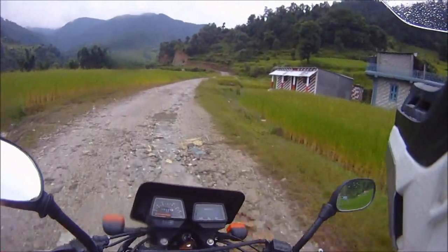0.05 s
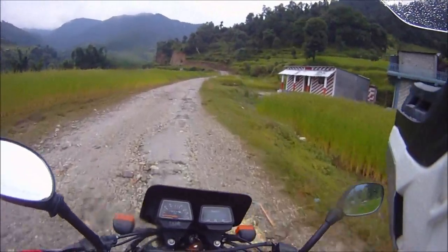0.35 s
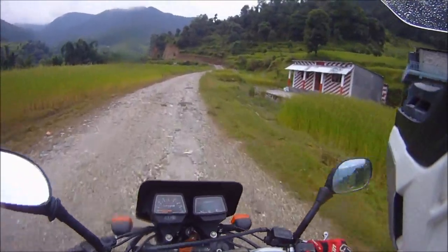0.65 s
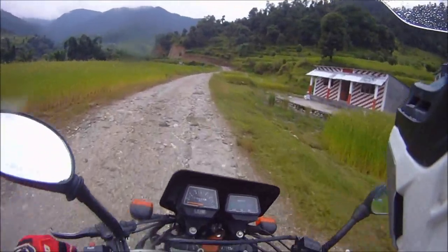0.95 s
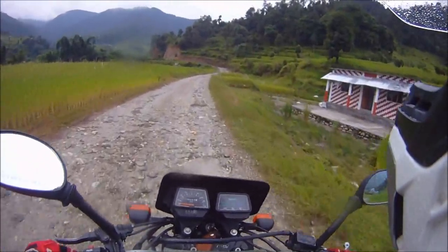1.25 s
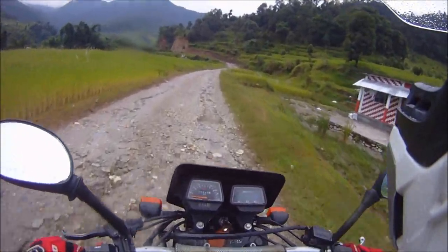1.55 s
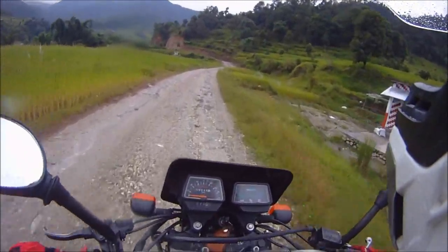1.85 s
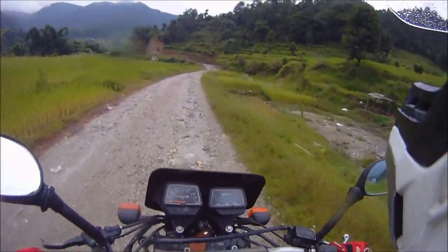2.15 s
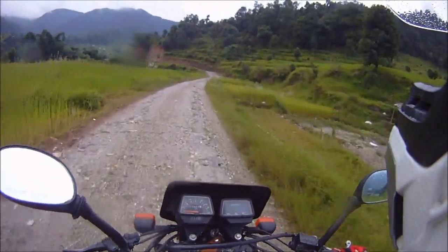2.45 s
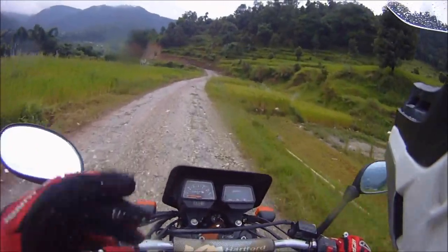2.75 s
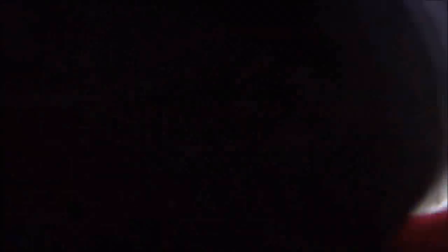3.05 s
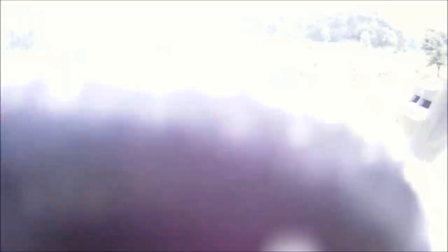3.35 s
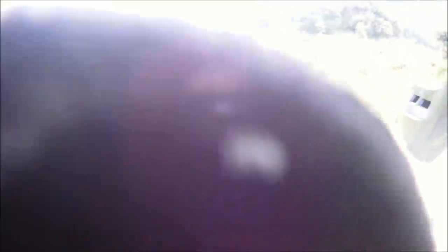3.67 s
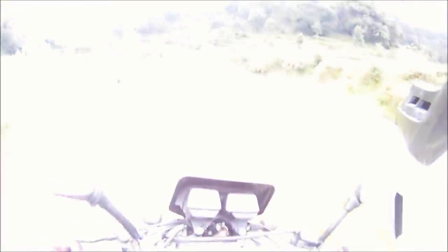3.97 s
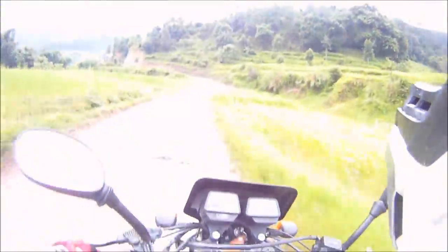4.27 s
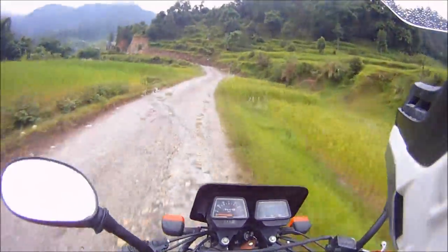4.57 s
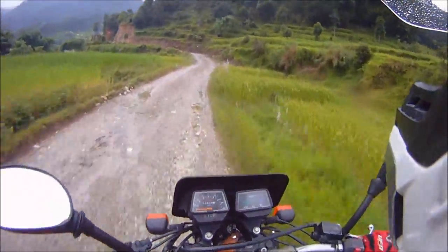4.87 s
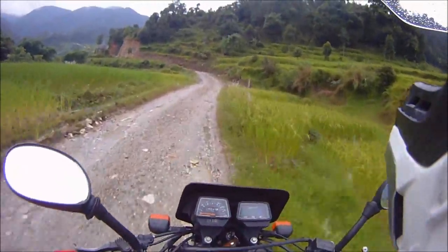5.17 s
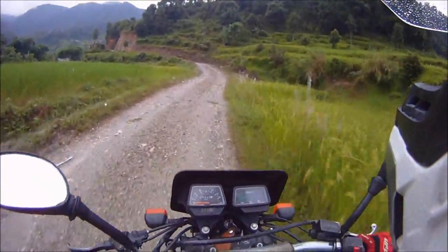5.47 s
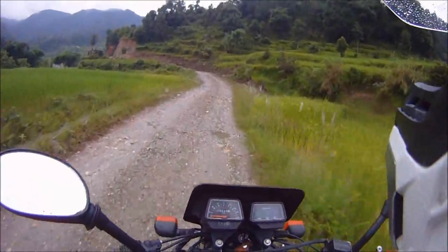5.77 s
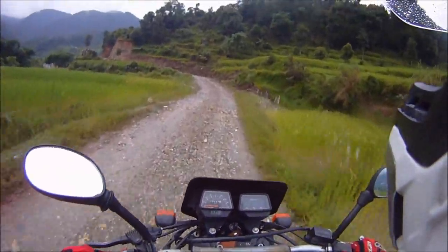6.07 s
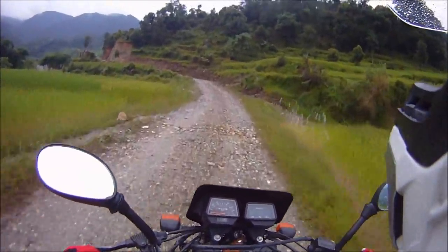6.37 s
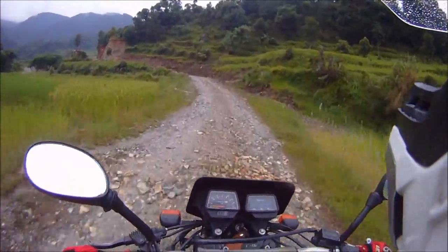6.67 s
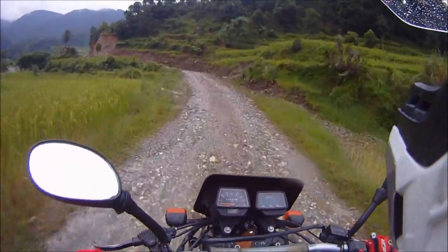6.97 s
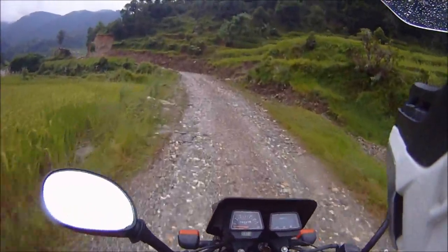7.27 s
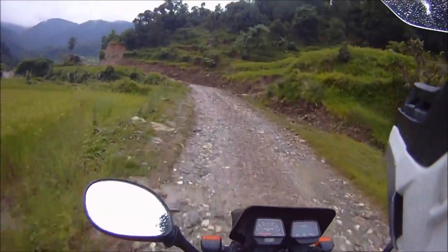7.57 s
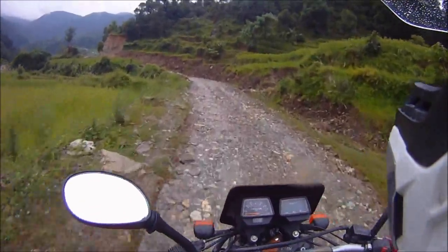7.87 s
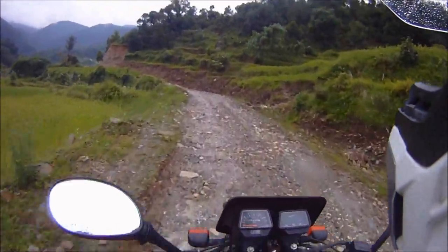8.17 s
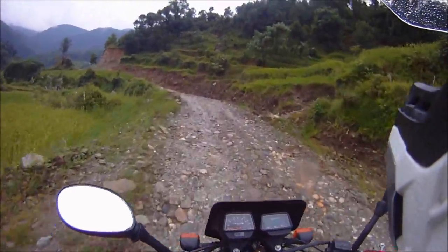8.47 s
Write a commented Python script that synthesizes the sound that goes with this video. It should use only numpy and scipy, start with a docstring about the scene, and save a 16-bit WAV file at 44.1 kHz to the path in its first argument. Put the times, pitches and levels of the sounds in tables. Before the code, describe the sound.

A single-cylinder motorcycle clatters along a gravel track, its intake honking softly as the throttle opens. The tyres hiss and crunch, stones tick against the bike and ruts rattle it. About three seconds in, a gloved hand knocks sharply on the camera case and wipes across it, much louder than the ride. The engine carries on, then slows near the end over more bumps. Everything is heard from a cased helmet camera.

```python
"""A single-cylinder four-stroke motorcycle clatters over hissing gravel, heard from a cased helmet camera.
Blows of piston and gears ring the engine casing, and the air box honks as the throttle opens. Stones and
ruts rattle and thump the bike, and the slack chain whirrs in spells. Midway a gloved hand knocks on the
camera case and wipes over it. Near the end the bike slows and the brake brushes its disc."""
import sys
import numpy as np
from scipy import signal
from scipy.fft import rfft, irfft, next_fast_len
from scipy.io import wavfile
from scipy.ndimage import map_coordinates

SR = 44100
rng = np.random.default_rng(int(sys.argv[2]) if len(sys.argv) > 2 else 0)


def file_out(sig):
    """Save sig as 16-bit WAV at sys.argv[1]."""
    # one column per channel
    cols = np.atleast_2d(sig).T
    # limit, then scale
    lim = np.clip(cols, -1, 1)
    pcm = np.round(lim * 32767).astype(np.int16)
    wavfile.write(sys.argv[1], SR, pcm)


N = 380141

# Engine speed. Each row: time in seconds, firing rate in Hz.
FIRING_RATE = [(0, 33.68), (.6, 34.3), (.77, 41.26), (1, 35.47), (1.15, 33.66), (1.47, 34.75),
               (1.62, 37.27), (1.84, 35.9), (1.98, 38.38), (2.28, 34.9), (2.75, 38.47), (3.55, 34.66),
               (4.05, 38.15), (4.7, 37.55), (5.13, 37.73), (5.25, 41.13), (5.44, 38.3), (5.58, 36.84),
               (5.7, 40.33), (5.9, 36.94), (6.6, 38.5), (6.92, 32.8), (7.5, 32.3), (8.62, 29.97)]
# Twists of the throttle. Each row: time fully open and start of closing in seconds, intake level in dB,
# opening time and closing time in seconds.
THROTTLE_TWISTS = [(0.106, 0.39, -74, 0.28, 0.09), (0.604, 0.657, -60, 0.23, 0.092),
                   (0.993, 1.4, -60.5, 0.21, 0.28), (1.595, 2.01, -61, 0.96, 0.3),
                   (4.307, 5.49, -60.5, 0.25, 0.11), (8.146, 8.18, -62, 0.12, 0.063),
                   (8.45, 8.543, -58, 0.035, 0.059)]
# Harmonics of the firing rate. Each entry: relative level in dB.
GULP_HARMONICS = [13, 1, -6.5, -7, -12]  # intake, 7th to 11th
THUD_HARMONICS = [-1, -1, -12, -4.5, -11]  # exhaust, 2nd to 6th

# Resonances. Each row: frequency in Hz, bandwidth in Hz, relative gain in dB.
CASING_MODES = [(446, 8.8, 0), (570, 78, -6), (690, 21, -2.5), (1154, 56, -5), (1455, 30, 2.5),
                (1446, 38, 0), (1724, 76, -3), (2713, 84, -2.5)]  # engine casing and fins
AIRBOX_MODES = [(336.2, 42.8, 0.5)]  # air box and snorkel
LOOSE_PART_MODES = [(446, 190, -9), (662, 270, -5.5), (938, 82, -8), (1110, 58, -8), (1439, 76, -1.5),
                    (1860, 570, -2.5), (2560, 190, -22), (2590, 140, -6), (3180, 490, -7), (3780, 290, -16),
                    (4680, 540, -1.5), (5130, 310, -12)]  # fenders, chain guard and fittings
CHAIN_MODES = [(2630, 53, 15), (2830, 270, -19), (3230, 110, 4)]

# Noise spectra. Each row: frequency in Hz, relative spectral density in dB.
CHURN_SPECTRUM = [(40, -23), (150, -9), (225, -0.5), (300, 5), (420, -4.5), (650, 7), (950, 3.5),
                  (1450, 7.5), (2200, -7), (2750, -35), (3400, -7), (6000, -57)]  # chain and gearbox
HISS_SPECTRUM = [(700, -16), (2000, 0), (2750, 0), (3200, -2.5), (3900, -0.5), (4750, 3.5), (5800, -5),
                 (6600, -13.5), (7400, -19), (7900, -19.5), (9000, -24.5), (12500, -33), (13300, -42)]  # tyres and valves
PALM_SPECTRUM = [(30, -20), (70, -10), (120, -20), (185, -0.5), (300, -7.5), (490, 3.5), (720, -3),
                 (1000, 0), (2000, -56)]
DRAG_SPECTRUM = [(30, -43), (100, -12.5), (180, -12.5), (330, -6.5), (490, -3), (750, 1.5), (1100, -4.5),
                 (1440, 2.5), (2200, -10), (3000, -14), (4650, -14), (6500, -38), (12000, -70)]
WIPE_SPECTRUM = [(100, -25.5), (600, -22.5), (950, -21), (1200, -0.5), (1450, 0), (1850, -14), (2250, -3),
                 (2600, 0.5), (2900, -13), (3300, -26), (4500, -23.5), (6500, -67), (12000, -62)]
SCRAPE_SPECTRUM = [(700, -10), (1450, 3), (2800, 10), (3600, 4.5), (4750, 7), (6000, -5), (7400, -18),
                   (8700, -19), (11000, -22.5), (13000, -28)]

# Swells of noise. Each row: centre in seconds, relative level in dB, half length in seconds.
GRAVEL_PATCHES = [(.56, -64, 0.024), (.76, -59, 0.25), (1.64, -61, 0.19), (1.99, -65.5, 0.18),
                  (3.99, -60.5, 0.16), (4.18, -64.5, 0.075), (4.47, -58, 0.22), (4.85, -64, 0.11),
                  (5.32, -61.5, 0.32), (6.8, -65.5, 0.28), (8.25, -64.5, 0.22), (8.6, -63.5, 0.088)]
STONE_SKIDS = [(.748, -58, 0.012)]
CHAIN_WHIRRS = [(2.5, -65, 0.32), (4, -65.5, 0.14), (5.6, -72, .15), (6.18, -65.5, 0.49),
                (8.55, -66.5, .12)]
PALM_PRESSES = [(2.855, -57, 0.03), (2.939, -38, 0.016), (2.967, -42, 0.0068), (2.978, -35.5, 0.0075),
                (3.052, -58, 0.0054), (3.074, -44, 0.0093), (3.48, -50, 0.0041), (3.775, -53, 0.0085)]
GLOVE_DRAGS = [(2.856, -53.5, 0.026), (2.958, -39.5, 0.04), (3.08, -44, 0.091), (3.17, -53.5, 0.087),
               (3.4, -61, 0.3), (3.617, -47, 0.025), (3.78, -61, 0.014)]
GLOVE_WIPES = [(2.874, -42, 0.011), (2.926, -34, 0.0018), (3.212, -39, 0.027), (3.301, -44.5, 0.053),
               (3.355, -42.5, 0.0085), (3.436, -43, 0.013), (3.511, -40.5, 0.017), (3.607, -38.5, 0.0069),
               (3.632, -42.5, 0.042), (3.762, -38, 0.026)]
GLOVE_SCRAPES = [(2.874, -50, 0.006), (2.975, -50.5, 0.068), (3.018, -55.5, 0.034), (3.085, -65, 0.046),
                 (3.19, -56, 0.015), (3.61, -70, 0.017), (3.784, -47, 0.012)]  # cloth by the microphone hole

# Roughness of the track. Each row: time in seconds, level in dB of the chatter it excites.
TRACK_ROUGHNESS = [(0, -62.5), (.45, -63), (.68, -53), (1.05, -61.5), (1.6, -56), (2, -67), (2.3, -61.5),
                   (3.8, -58.5), (4.6, -57), (5.5, -57.5), (6.2, -67.5), (6.8, -62), (7, -66), (7.1, -91),
                   (7.45, -89), (7.6, -68), (8.3, -65), (8.62, -58.5)]
# Jolts from stones and bumps. Each row: start in seconds, relative levels in dB of the low body,
# middle clank and high ping, 60 dB decay time in seconds.
JOLTS = [(0.479, -46, -47, -50, 0.032), (0.571, -58, -45.5, -47, 0.059), (0.683, -54, -55, -56, 0.17),
         (1.69, -48, -54, -43, 0.034), (1.921, -41, -50, -45, 0.16), (3.951, -42.5, -52, -48, 0.049),
         (3.976, -39, -48.5, -54, 0.084), (4.276, -48, -44, -47, 0.031), (4.317, -54, -53, -37, 0.029),
         (4.697, -44, -56, -43, 0.054), (4.795, -48, -49, -41.5, 0.059), (5.432, -54, -43.5, -42, 0.037),
         (6.657, -46, -39, -32.5, 0.082), (6.96, -51, -54, -55, 0.17), (7.079, -68, -53, -59, 0.079),
         (7.26, -67, -55, -59, 0.085), (7.288, -65, -58, -64, 0.13), (7.556, -67, -55, -62, 0.1),
         (7.762, -64, -58, -66, 0.11), (7.913, -47.5, -56, -56, 0.18), (7.941, -45, -46.5, -49, 0.11),
         (8.31, -62, -50, -42, 0.029), (8.414, -40.5, -53, -41, 0.038)]
# Stones flung against the bike. Each row: start in seconds, peak in dB, lower and upper band edge in Hz,
# 60 dB decay time in seconds.
STONE_HITS = [(0.479, -39, 2570, 3500, .02), (1.347, -38, 1720, 2930, 0.011),
              (2.233, -41, 1600, 4400, 0.01), (3.952, -41, 2183, 3400, 0.013),
              (3.978, -40, 1400, 2910, .012), (4.2762, -34, 2870, 3600, 0.02),
              (4.697, -42, 1299, 2200, 0.011), (4.8486, -31.5, 1550, 2880, 0.01),
              (4.8691, -39, 2280, 3010, 0.0093), (5.432, -38.5, 3380, 4000, 0.024),
              (8.3102, -42, 1706, 2594, .016), (8.4139, -37.5, 2800, 3416, 0.022)]
# Knocks of suspension and frame in ruts. Each row: start in seconds, peak in dB, pitch in Hz,
# 60 dB decay time in seconds.
RUT_KNOCKS = [(.603, -46, 605, 0.092), (.628, -48, 520, 0.05), (.653, -49, 581, .07),
              (.725, -48, 926, 0.057), (1.836, -44, 655, 0.051), (1.909, -43, 1100, 0.095),
              (1.996, -43, 660, 0.065), (4.486, -40, 985, .05), (4.699, -39, 1057, 0.055),
              (6.791, -44.5, 570, 0.054), (6.834, -41.5, 675, 0.024), (6.989, -51, 526, 0.048),
              (7.285, -51, 1207, 0.12), (7.294, -60, 330, 0.14), (7.31, -54, 1002, .07),
              (7.765, -51, 1147, .09), (7.513, -52, 590, 0.038), (7.556, -50, 751, 0.14),
              (7.607, -47.5, 557, 0.061), (7.632, -52, 1000, 0.052), (7.664, -55.5, 535, 0.058),
              (7.72, -54, 595, 0.06), (7.809, -49.5, 729, 0.064), (8.073, -48, 786, 0.13),
              (8.108, -41.5, 700, 0.061), (8.152, -43, 762, 0.053)]
# Fingers striking the camera case. Each row: start in seconds, peak in dB, contact time in ms,
# tuning factor, longest 60 dB decay time in seconds.
FINGER_KNOCKS = [(2.8547, -19.5, 0.017, 0.99, 0.0059), (2.855, -19.5, 0.12, 1, .012),
                 (2.9277, -23, 0.32, 0.92, 0.016), (3.1278, -8, 0.14, 0.99, .034),
                 (3.207, -38, 0.11, 0.68, .02)]
# Modes of the camera case. Each row: frequency in Hz, 60 dB decay time in seconds, relative level in dB.
CAMERA_CASE_MODES = [(1360, 0.0075, -28), (1480, 0.012, 16.5), (1795, 0.0051, 12), (2360, 0.0049, 3),
                     (2740, 0.034, -3), (4650, 0.0051, 10.5), (5870, 0.01, -11), (8260, 0.0037, -1)]


def undb(db):
    """Amplitude grows tenfold for every 20 dB."""
    return 10 ** (np.asarray(db) / 20)


def unit(x):
    """Normalisation to an rms of 1."""
    return x / np.sqrt(np.mean(x ** 2))


def noise():
    """White noise spreads its power evenly over frequency."""
    return rng.standard_normal(N)


def walk(rate):
    """Interpolating `rate` random values a second gives a wander with a spread near 1."""
    return np.interp(np.arange(N) / SR * rate, np.arange(N), noise())


def curve(rows):
    """Linear interpolation turns (seconds, value) rows into a control signal."""
    return np.interp(np.arange(N) / SR, *np.transpose(rows))


def swells(rows):
    """Gaussian swells superpose into one amplitude envelope."""
    t = np.arange(N) / SR
    return sum(undb(db) * np.exp(-((t - centre) / half) ** 2) for centre, db, half in rows)


def colour(x, spectrum):
    """Spectral shaping weights each frequency by a (Hz, dB) curve; rms 1."""
    hz, db = np.transpose(spectrum)
    size = next_fast_len(N)
    bin_hz = np.maximum(np.fft.rfftfreq(size, 1 / SR), 1)
    gain = undb(np.interp(np.log(bin_hz), np.log(hz), db))
    return unit(irfft(rfft(x, size) * gain, size)[:N])


def resonator(x, hz, width):
    """A damped resonator responds most near its natural frequency."""
    return signal.lfilter(*signal.iirpeak(hz, hz / width, SR), x)


def resonate(x, modes):
    """A driven body responds with the sum of its modes; rms 1."""
    return unit(sum(undb(db) * resonator(x, hz, width) for hz, width, db in modes))


def band(x, lo_hz, hi_hz, order=2):
    """A band-pass filter attenuates what lies beyond its two edges."""
    return signal.sosfilt(signal.butter(order, [lo_hz, hi_hz], "band", fs=SR, output="sos"), x)


def waver(x, depth_ms, rate):
    """A wandering delay modulates the pitch slightly."""
    at = np.arange(N) + depth_ms / 1000 * SR * walk(rate)
    return map_coordinates(x, [at], mode="mirror")


def add(out, start, x):
    """Superposition of a short sound at a start in seconds."""
    i = int(start * SR)
    out[i:i + len(x)] += x[:max(N - i, 0)]


def pulses(cycles, scatter_db):
    """An impulse train has one pulse, here of uneven size, at each whole cycle."""
    at = np.flatnonzero(np.diff(np.floor(cycles)) > 0)
    out = np.zeros(N)
    out[at] = undb(scatter_db * rng.standard_normal(N // 100)[:len(at)])
    return out


def shower(t60):
    """An impact is followed by small contacts that die away exponentially."""
    t = np.arange(SR // 4) / SR
    shake = rng.standard_normal(len(t)) * np.exp(-np.log(1000) * t / t60)
    shake[0] = 4  # the impact itself
    return shake


def engine_speed(surge_from_s=4.295, surge_to_s=4.98, period_s=0.172, depth_hz=1.26):
    """Frequency modulation: the firing rate in Hz surges to and fro for a spell as the chain snatches."""
    t = np.arange(N) / SR
    surging = (t > surge_from_s) & (t < surge_to_s)
    return curve(FIRING_RATE) + surging * depth_hz * np.sin(2 * np.pi * (t - surge_from_s) / period_s)


def throttle(shut_db=-79):
    """Airflow sets the intake level in dB: each twist opens, holds and closes."""
    t, opening = np.arange(N) / SR, np.zeros(N)
    for opened, closing, db, rise_s, fall_s in THROTTLE_TWISTS:
        held = np.clip(np.minimum(1 + (t - opened) / rise_s, 1 - (t - closing) / fall_s), 0, 1)
        opening = np.maximum(opening, undb(db) * held)
    return 20 * np.log10(opening + undb(shut_db))


def clatter(cycles, clatter_db):
    """Impact excitation: piston and gears ring the casing each crank turn; chain and gearbox churn."""
    first, second = cycles - 0.1, cycles - 0.62  # two crank turns to a firing
    blows = np.exp(-(first % 1) / 0.7) + 0.5 * np.exp(-(second % 1) / 0.38)
    slap = unit(pulses(first, scatter_db=2) + 0.5 * pulses(second, scatter_db=2))
    force = 0.8 * slap + unit(blows * noise()) * undb(2 * walk(30))
    ring = unit(band(resonate(force, CASING_MODES), 363, 3800, order=3))
    ring = waver(ring, depth_ms=0.31, rate=25)
    churn = colour((1 + 0.35 * blows) * noise() * undb(1.3 * walk(30)), CHURN_SPECTRUM)
    rougher_db = curve(TRACK_ROUGHNESS) + 62  # above ordinary ground
    return undb(clatter_db) * (undb(-5) * ring + undb(-3 + 0.0247 * rougher_db) * churn)


def intake_and_exhaust(cycles, intake_db):
    """Forced resonance: gulps of air honk most when a harmonic meets the air box mode; the exhaust thuds."""
    uneven = cycles + 0.013 * walk(38)  # each gulp comes a little early or late
    gulps = sum(undb(db + 1.1 * walk(20)) * np.cos(2 * np.pi * k * uneven)
                for k, db in enumerate(GULP_HARMONICS, start=7))
    turbulence = undb(-2) * noise()
    honk = resonate(resonate(gulps + turbulence, AIRBOX_MODES), AIRBOX_MODES)
    thud = sum(undb(db + 2 * walk(6.7)) * np.sin(2 * np.pi * k * cycles)
               for k, db in enumerate(THUD_HARMONICS, start=2))
    return honk * undb(intake_db) + unit(thud) * undb(0.46 * intake_db - 52.5)


def tyres_and_valves(cycles, level, stones_per_s=400, crunch_decay_s=0.0078):
    """Random impacts under the tyres merge into hiss and crunch; the valves tick once a cycle."""
    stones = (rng.random(N) < stones_per_s / SR) * undb(4 * np.minimum(rng.exponential(size=N), 2))
    crunch = signal.lfilter([1], [1, -np.exp(-1 / (crunch_decay_s * SR))], stones) * noise()
    sand = noise() * undb(2.2 * walk(70))
    valves = np.exp(-((cycles - 0.58) % 1) / 0.11) * noise()
    return level * undb(2) * colour(sand + 0.86 * unit(crunch) + 0.37 * unit(valves), HISS_SPECTRUM)


def chatter(jolts_per_s=170, decay_s=0.014):
    """Random excitation: small jolts keep the loose parts vibrating, more on rough ground."""
    jolts = (rng.random(N) < jolts_per_s / SR) * undb(4 * np.clip(noise(), -1, 1))
    energy = signal.lfilter([1], [1, -np.exp(-2 / (decay_s * SR))], jolts ** 2 + 1e-18)
    ring = resonate(np.sqrt(energy) * noise(), LOOSE_PART_MODES)
    return undb(curve(TRACK_ROUGHNESS)) * unit(band(ring, 423, 1810, order=3))


def rattles():
    """Modal response: each large jolt rings the loose parts with a dying shower of contacts."""
    out = np.zeros(N)
    for start, body_db, clank_db, ping_db, t60 in JOLTS:
        shake, ring = shower(t60), 0
        for hz, width, db in LOOSE_PART_MODES:
            jolt_db = np.interp(hz, [1100, 1400, 3200, 3700], [body_db, clank_db, clank_db, ping_db])
            width_gain = np.sqrt(SR / np.pi / width)  # equal noise power for narrow and wide modes
            ring = ring + undb(db + jolt_db) * width_gain * resonator(shake, hz, width)
        add(out, start, undb(-5) * band(ring, 560, 4600, order=3))
    return out


def stone_ticks(ring_db=-2):
    """A hard impact is brief and bright: a flung stone cracks, and the struck metal rings briefly."""
    out, t = np.zeros(N), np.arange(SR // 4) / SR
    for start, db, low_hz, top_hz, t60 in STONE_HITS:
        crack = band(shower(t60), low_hz, top_hz, order=1)
        crack = band(crack, 1120, 5560, order=4)
        ring = np.sin(2 * np.pi * np.sqrt(low_hz * top_hz) * t) * np.exp(-np.log(1000) * t / t60)
        tick = unit(crack) + undb(ring_db) * unit(ring)
        add(out, start, undb(db) * tick / np.abs(tick).max())
    return out


def frame_thumps(edge_ratio=1.335, mean_gap_s=0.011, bounce_db=-7, scatter_octaves=0.25):
    """Heavy damping broadens a resonance: ruts knock the frame dully, each rebound on another spot."""
    out = np.zeros(N)
    for start, db, hz, t60 in RUT_KNOCKS:
        spot_hz = hz
        for bounce in range(3):
            knock = band(shower(t60), spot_hz / edge_ratio, spot_hz * edge_ratio, order=1)
            knock = band(knock, 206, 2300)
            add(out, start, undb(db + bounce * bounce_db) * knock / np.abs(knock).max())
            start += mean_gap_s * (0.5 + rng.random())
            spot_hz = hz * 2 ** (scatter_octaves * rng.uniform(-1, 1))
    return out


def stone_skid(centre_hz=2060, octaves_per_s=12, width_hz=260):
    """Sliding friction: a stone squeezed from under the tyre scrapes, falling in pitch as it slows."""
    from_centre_s = np.clip(np.arange(N) / SR - STONE_SKIDS[0][0], -0.05, 0.05)
    hz = centre_hz * 2 ** (-octaves_per_s * from_centre_s)
    phase = 2 * np.pi * np.cumsum(hz) / SR
    return swells(STONE_SKIDS) * (walk(width_hz) * np.sin(phase) + walk(width_hz) * np.cos(phase))


def chain_whirr():
    """Noise-driven resonance: the slack chain rings in spells, wavering in pitch and level."""
    ring = waver(resonate(noise(), CHAIN_MODES), depth_ms=0.486, rate=22)
    return swells(CHAIN_WHIRRS) * ring * undb(2.7 * walk(28))


def glove():
    """Stick-slip friction: cloth drags, wipes and scrapes on the case, over dull pushes of the palm."""
    palm = swells(PALM_PRESSES) * colour(noise(), PALM_SPECTRUM)
    drag = swells(GLOVE_DRAGS) * colour(noise() * undb(3.2 * walk(160)), DRAG_SPECTRUM)
    wipe = swells(GLOVE_WIPES) * colour(noise() * undb(2 * walk(300)), WIPE_SPECTRUM)
    catching = noise() * undb(4.5 * np.clip(walk(400), -2, 1))
    scrape = swells(GLOVE_SCRAPES) * colour(catching, SCRAPE_SPECTRUM)
    return palm + drag + wipe + scrape


def case_knocks():
    """Free vibration of stiff plastic: longer contact weakens high modes, a resting finger damps them."""
    out, t = np.zeros(N), np.arange(SR // 20) / SR
    for start, db, contact_ms, tuning, longest_s in FINGER_KNOCKS:
        ring = 0
        for hz, t60, mode_db in CAMERA_CASE_MODES:
            decay = np.exp(-np.log(1000) * t / min(t60, longest_s))
            ring = ring + undb(mode_db) * np.sin(2 * np.pi * hz * tuning * t) * decay
        force = t * np.exp(-2 * t * 1000 / contact_ms)
        knock = band(signal.fftconvolve(ring, force)[:len(t)], 1640, 7300, order=3)
        add(out, start, undb(db) * knock / np.abs(knock).max())
    return out


def brake(centre_s=7.35, half_length_s=1, level_db=-71):
    """Friction excites one mode of the disc as the brake brushes it."""
    ring = unit(resonator(noise(), hz=3600, width=150))
    return swells([(centre_s, level_db, half_length_s)]) * ring


def scene(cruise_hz=36.27, full_load_db=-64.5):
    """Superposition: speed and throttle govern engine and tyres; track and hand add their own sounds."""
    firing_hz, intake_db = engine_speed(), throttle()
    faster_hz = firing_hz - cruise_hz
    load = np.minimum(undb(intake_db - full_load_db), 1)
    clatter_db = -58.5 + 0.72 * faster_hz + 3.5 * load + 0.35 * walk(7.7)
    rolling = undb(-63.5 + 0.5 * faster_hz + 1.5 * load + 0.22 * walk(8.3))
    hiss_level = np.hypot(rolling, swells(GRAVEL_PATCHES))  # incoherent noises add in power
    cycles = np.cumsum(firing_hz * (1 + 0.003965 * walk(30))) / SR
    engine = intake_and_exhaust(cycles, intake_db) + clatter(cycles, clatter_db)
    running_gear = chain_whirr() + brake() + tyres_and_valves(cycles, hiss_level)
    track = chatter() + rattles() + frame_thumps() + stone_ticks() + stone_skid()
    return (engine + running_gear + track + case_knocks() + glove())[None]


def record(dry, cutoff_hz=13000):
    """Band limiting: the camera cuts the top of the treble steeply."""
    return signal.sosfilt(signal.ellip(8, 0.2, 70, cutoff_hz, fs=SR, output="sos"), dry)


dry = scene()
out = record(dry)
file_out(out)
```